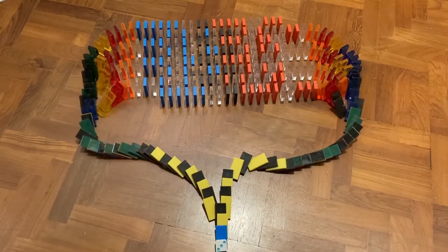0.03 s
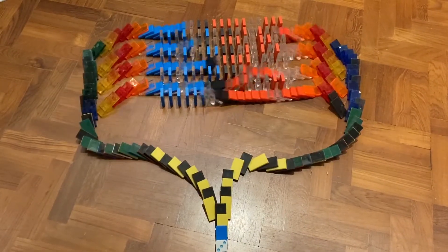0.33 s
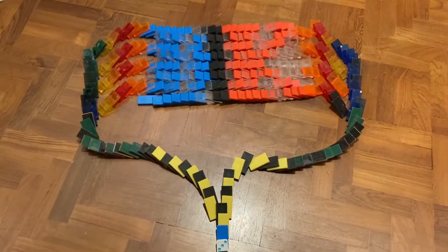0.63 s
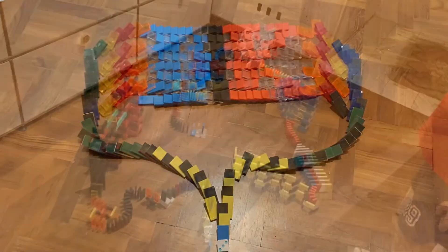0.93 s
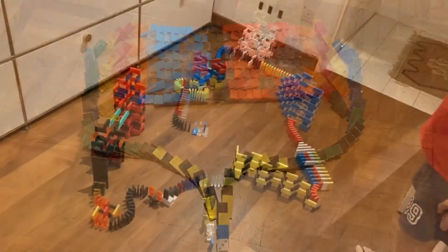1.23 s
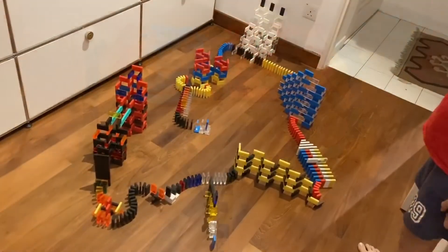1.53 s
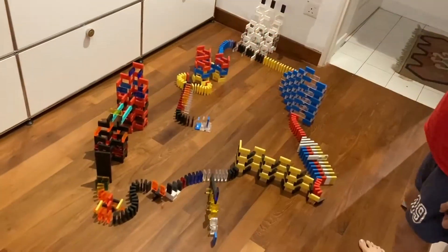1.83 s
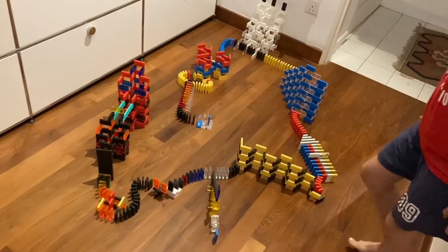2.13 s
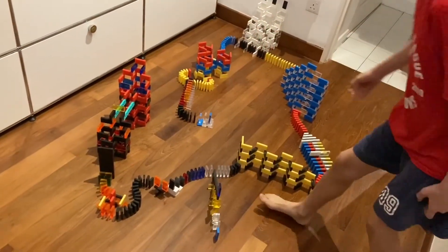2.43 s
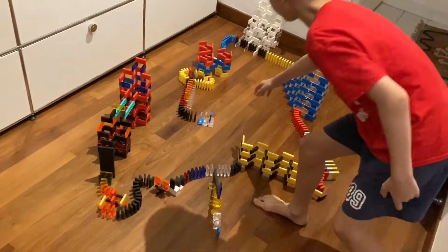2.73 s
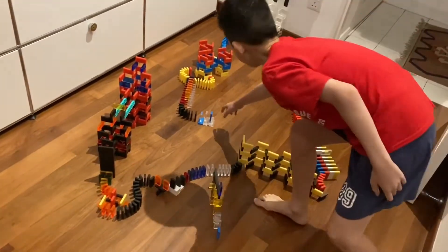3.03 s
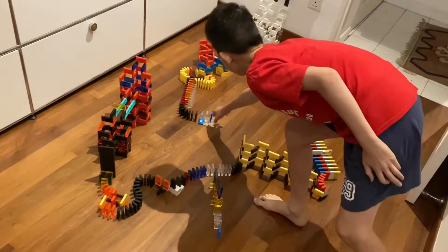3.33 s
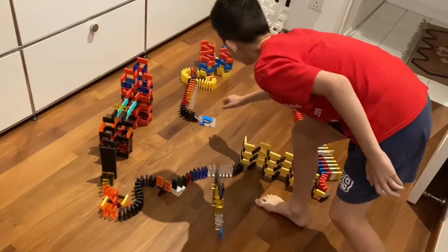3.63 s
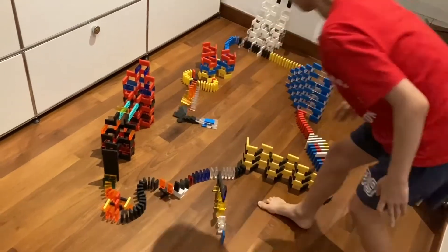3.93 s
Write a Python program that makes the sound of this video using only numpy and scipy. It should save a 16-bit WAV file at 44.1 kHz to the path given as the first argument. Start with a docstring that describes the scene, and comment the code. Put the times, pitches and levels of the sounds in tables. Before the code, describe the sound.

A dense clatter of falling plastic dominoes fades quickly in a small, slightly echoing room. After a quiet stretch with dull footsteps and brushing cloth, a second run begins toppling on the wooden floor, growing louder.

```python
"""A small live room with a wooden floor. A wide field of plastic dominoes clatters down and dies away;
the scene dissolves to a second layout, where someone steps up barefoot, clothes brushing, and tips over
a new line. Each collision is an impulse: a short broadband crack, then the damped free vibration of the
tiles, two kinds with different natural frequencies. The floor boards resonate under the clatter, and
the room adds reverberation and a dull noise."""
import sys
import numpy as np
from scipy import signal
from scipy.fft import rfft, irfft
from scipy.io import wavfile
from scipy.ndimage import uniform_filter1d

SR = 44100
rng = np.random.default_rng(int(sys.argv[2]) if len(sys.argv) > 2 else 0)


def wav_out(sig):
    """Save sig, one row per channel (or a flat mono array), as 16-bit PCM at SR to the path in sys.argv[1]."""
    wavfile.write(sys.argv[1], SR, np.round(np.clip(np.atleast_2d(sig).T, -1, 1) * 32767).astype(np.int16))


N = 176400

# spectra of room noise, cloth and a heel's rumble (frequency [Hz], relative level [dB])
AIR_SPECTRUM = [(20, -23.5), (45, -5), (110, 1.5), (180, 0), (250, -6), (400, -5.5), (600, -11.5),
                (1000, -11), (1700, -18.5), (2500, -28), (4000, -42), (6000, -53), (16000, -55)]
CLOTH_SPECTRUM = [(500, -15), (2000, -5), (3500, 4.5), (5000, 1.5), (7500, 0.5), (11000, -1.5),
                  (16000, -16)]
HEEL_SPECTRUM = [(20, -18.5), (45, -4.5), (100, 3.5), (220, -21.5), (800, -38), (4000, -76.5)]
# course of the room noise, and fade of the field in the dissolve (time [s], gain [dB])
AIR_GAIN = [(0, -2), (0.299, -14), (.65, -19), (.85, -10), (1.3, -3.5), (1.7, -0.5), (2.1, 1), (2.5, 0),
            (3.3, 1.5), (4, -3)]
FIELD_FADE = [(.65, -0.5), (.9, 0), (1.05, -4), (1.4, -11)]
# likeness of the two microphone ports (frequency [Hz], correlation [0-1])
PORT_CORRELATION = [(40, 1), (130, 0.95), (280, 0.9), (550, .45), (1000, .4), (2000, 0.1), (4500, 0.23),
                    (5500, 0.7), (9000, 1), (16000, 1)]
# brushes of cloth and soles (time [s], level [dB], rise [s], decay constant [s])
CLOTH_STROKES = [(1.784, -63.5, .012, 0.055), (1.919, -64.5, 0.016, 0.041), (2.374, -56, 0.03, 0.074),
                 (2.54, -68.5, 0.071, 0.31), (2.81, -72.5, .025, 0.036), (3.045, -58, 0.014, 0.044),
                 (3.13, -54.5, .12, 0.11)]
# faint squeaky scuffs (time [s], level [dB], frequency [Hz])
SQUEAKS = [(2.225, -69.5, 3900), (2.265, -64.5, 2980), (2.36, -66.5, 2430), (2.54, -65, 3640),
           (2.59, -63, 3500), (2.68, -64, 3470), (2.75, -71, 3380)]
# soft footfalls (time [s], level [dB], frequency [Hz], length [s])
FOOTFALLS = [(.955, -43, 67.3, 0.023), (1.539, -38, 50.4, 0.043), (1.903, -40, 73.5, .06),
             (2.636, -45, 57.3, 0.051), (2.81, -45, 48, 0.042)]
# modes of the boards, a faint plastic tick, a larger piece, and each layout's low and high tiles
# (frequency [Hz], relative level [dB], T60 [s])
BOARD_MODES = [(1040, -10, 0.031), (1385, -5.5, 0.065), (1480, -7, .03), (1643, -0.5, .05),
               (1780, -1.5, .06), (2300, -1, .012)]
TICK_MODES = [(3900, -5, .012), (4120, 1, 0.032), (4210, -2, 0.027), (4430, -5, 0.024), (4630, -4, .012)]
BLOCK_MODES = [(1283, -13.5, .02), (1450, -10.5, 0.018), (1660, -12.5, .03), (2664, -1, .02),
               (2866, 0.5, 0.01215), (2990, 2.5, .018)]
FIELD_TILE_MODES = ([(4250, -6.5, .06), (4620, -3, .06), (8100, -6.5, .01), (10490, 1.5, 0.028),
                    (10860, -7.5, 0.055)], [(3490, -13.5, .03), (5584, 4, 0.11), (6060, -2.5, .04),
                    (7560, -7, .02), (12900, -6, 0.05), (14100, -7, 0.023)])
LINE_TILE_MODES = ([(4463, 2, 0.034), (4653, -2.5, .035), (6150, -8.5, .025), (9860, -4.5, .012),
                   (10740, -5, .015)], [(3505, -10.5, 0.022), (5648, -0.5, .05), (6200, -8, .025),
                   (7620, -3, .008), (12880, -3.5, .025), (14380, -7, .014)])
# contacts of the tick, and of the larger piece as it rattles to rest (time [s], level [dB])
TICK_CONTACTS = [(1.795, -51), (1.808, -47), (1.823, -55.5)]
BLOCK_BOUNCES = [(.647, -21.5), (.68, -34.5), (.735, -38), (.785, -36.5), (.81, -41), (.852, -45.5),
                 (.88, -52.5)]
# spectrum of the contact crack (frequency [Hz], relative level [dB])
FIELD_CRACK_SPECTRUM = [(200, -54), (500, -24), (1000, -18), (2000, -7.5), (3500, -3), (5000, 1.5),
                        (8000, 0.5), (10000, 0.5), (12000, -8), (14000, 0.5), (16000, -17.5)]
LINE_CRACK_SPECTRUM = [(200, -26), (500, -26), (1000, -16), (2000, -7), (3500, 0.5), (5000, 4.5),
                       (8000, 3.5), (10000, 0.5), (12000, -0.5), (14000, -4.5), (16000, -10)]
# level of the running clatter (time [s], low tiles [dB], high tiles [dB], boards [dB])
FIELD_CLATTER = [(0, -34, -22.5, -40), (.045, -40, -28.5, -50.5), (.11, -29.5, -23, -43.5),
                 (.17, -23.5, -19.5, -34), (.25, -20.5, -25, -29.5), (.31, -26, -31, -47),
                 (.38, -23.5, -32.5, -57.5), (.5, -24.5, -37.5, -55.5), (.57, -24.5, -36, -48),
                 (.63, -35.5, -47, -61.5), (.65, -24, -42.5, -43), (.71, -43.5, -56.5, -52),
                 (.79, -41.5, -56, -54.5), (.87, -61.5, -72, -62.5), (.94, -75, -90, -93)]
LINE_CLATTER = [(3.31, -55, -76, -90), (3.33, -52.5, -55.5, -69.5), (3.455, -54, -51, -76.5),
                (3.485, -31, -44.5, -51), (3.53, -31, -52, -53.5), (3.595, -43, -56, -55.5),
                (3.61, -30.5, -43, -56), (3.68, -31, -38, -54), (3.74, -30.5, -38.5, -53.5),
                (3.79, -31.5, -28.5, -60), (3.9, -37, -24, -53), (3.94, -38, -34, -59.5),
                (4, -40, -31, -57)]
# collisions that stand out (time [s], level [dB], share of high tile [0-1], ping frequency [Hz])
FIELD_IMPACTS = [(0.062, -21.5, .8, 6090), (.084, -21.5, 1, 5600), (0.1012, -15, .6, 9730),
                 (.125, -20, .7, 7300), (.146, -17, .6, 8360), (0.294, -9, .05, 10200),
                 (0.3186, -21, .05, 10700), (0.3432, -18, .05, 10140), (0.464, -18, .1, 8200),
                 (0.4749, -12, .1, 8230), (0.4894, -18, .1, 8400), (0.6053, -17.5, .05, 10630),
                 (0.641, -26, 0.22, 8000)]
LINE_IMPACTS = [(3.320, -39.5, 0.35, 5764), (3.418, -35, 0.17, 10500), (3.4598, -27, .3, 4620),
                (3.489, -34.5, .05, 4640), (3.516, -30, .05, 10900), (3.561, -32.5, .05, 10900),
                (3.604, -25, .05, 4500), (3.608, -23, .05, 10900), (3.616, -22, .05, 4470),
                (3.654, -24.5, .1, 10800), (3.704, -20.5, .1, 4400), (3.729, -23.5, .1, 4450),
                (3.749, -13, 0.72, 12900), (3.7515, -21, .8, 3510), (3.8, -20.5, 1, 12900),
                (3.825, -10.5, .9, 14300), (3.8449, -17, .9, 14000), (3.876, -14.5, 0.95, 7610),
                (3.9, -14.5, 0.71, 7770), (3.9077, -15, .9, 9300), (3.9615, -17, 1, 7510),
                (3.9655, -18.5, .9, 7600), (3.993, -18, 1, 5600)]
# treble phase between the ports (lag [ms], in-phase frequency [Hz], onset frequency [Hz])
FIELD_PORTS, LINE_PORTS = (0.15, 8420, 2100), (-.225, 11300, 1400)

ROOM_T60_S, TREBLE_T60_S, ROOM_DB, ROOM_BUILD_S = 0.71, 0.41, -3, 0.0017
AIR_DB, MAX_CORRELATION, TOP_HZ = -45, .96, 15900
SCUFF_S, SCUFF_Q, BRUSH_FLICKER_DB = .018, 16, 2.0
DETUNE, SCATTER_DB, CRACK_VARY_DB = 0.0054, 2.5, 3.5  # random spread of pitch, strength and colour
CRACK_S, HIT_CRACK_S, HIT_RISE_S, CONTACT_S = 0.0031, .003, 0.00066, 0.0029
FIELD_RING_DB, LINE_RING_DB, HIT_RING_DB = -3, 0.5, -2  # ring against crack
PING_DB, PING_T60_S = -1.5, .022


def undb(db):
    """Amplitude ratio of a level in decibels."""
    return 10 ** (np.asarray(db) / 20)


def unit(x):
    """Normalisation to unit energy per channel."""
    return x / np.sqrt(np.sum(x ** 2, axis=-1, keepdims=True) + 1e-18)


def curve(points, size):
    """Interpolation of (frequency, value) points over log frequency, at the bins of a transform."""
    hz, value = np.array(points, float).T
    return np.interp(np.log(np.fft.rfftfreq(size, 1 / SR) + 1e-3), np.log(hz), value)


def envelope(points):
    """Amplitude envelope, linear in decibels between (time, gain) points."""
    return undb(np.interp(np.arange(N) / SR, *np.array(points).T))


def tint(x, points):
    """Minimum-phase filtering: folding the cepstrum gives a causal filter with the given spectrum."""
    size = 2 * x.shape[-1]
    cepstrum = irfft(np.log(undb(curve(points, size))))
    cepstrum[1:size // 2] *= 2
    cepstrum[size // 2 + 1:] = 0
    return irfft(rfft(x, size) * np.exp(rfft(cepstrum)))[..., :size // 2]


def noise(spectrum):
    """Spectral shaping of white noise: two uncorrelated channels of rms 1."""
    return unit(tint(rng.standard_normal((2, N)), spectrum)) * np.sqrt(N)


def add(out, start_s, x):
    """Superposition of a sound from a given time."""
    i = max(int(start_s * SR), 0)
    out[:, i:i + x.shape[1]] += x[:, :max(N - i, 0)]


def air():
    """Ambient noise: mostly low frequencies, louder at the second layout."""
    return noise(AIR_SPECTRUM) * undb(AIR_DB) * envelope(AIR_GAIN)


def room(x):
    """Reverberation: a diffuse tail follows the direct sound and decays exponentially, treble first."""
    t = np.arange(SR) / SR
    tail = np.zeros((2, SR))
    for band, t60 in (("low", ROOM_T60_S), ("high", TREBLE_T60_S)):
        crossover = signal.butter(2, 5000, band, fs=SR, output="sos")
        tail += signal.sosfilt(crossover, rng.standard_normal((2, SR))) * np.exp(-np.log(1000) * t / t60)
    tail = unit(tail * (1 - np.exp(-t / ROOM_BUILD_S)))
    return x + undb(ROOM_DB) * signal.fftconvolve(x, tail, axes=1)[:, :N]


def ports(x, lag_ms, agree_hz, from_hz):
    """Coherence of two microphone ports: high in the bass, low midway, high but phase-shifted above."""
    hz = np.fft.rfftfreq(N, 1 / SR)
    alike = np.clip(curve(PORT_CORRELATION, N), 0, MAX_CORRELATION)
    phase_shift = np.exp(-2j * np.pi * (hz - agree_hz) * lag_ms / 1000 * (hz > from_hz))
    left, right = rfft(x)
    mid = left * np.sqrt((1 + alike) / 2)
    side = right * np.sqrt((1 - alike) / 2)
    return irfft(np.array([mid + side, (mid - side) * phase_shift]), N)


def swell(start, rise, fade):
    """Envelope with a linear attack and an exponential decay."""
    t = np.arange(N) / SR - start
    return np.clip(t / rise, 0, 1) * np.exp(-np.maximum(t - rise, 0) / fade)


def brushes():
    """Friction noise: cloth and soles rub unevenly, and a narrow resonance makes each scuff squeak."""
    flicker = unit(uniform_filter1d(rng.standard_normal(N), size=400)) * np.sqrt(N)
    strokes = sum(undb(db) * swell(start, rise, fade) for start, db, rise, fade in CLOTH_STROKES)
    out = strokes * undb(BRUSH_FLICKER_DB * flicker) * noise(CLOTH_SPECTRUM)
    for start, db, hz in SQUEAKS:
        squeak = signal.lfilter(*signal.iirpeak(hz, SCUFF_Q, fs=SR), rng.standard_normal((2, N)))
        out += undb(db) * swell(start, SCUFF_S, SCUFF_S) * unit(squeak) * np.sqrt(N)
    return out


def steps():
    """Soft impact: a bare heel on the floor excites only a low tone and a rumble."""
    out, t = np.zeros((2, N)), np.arange(SR // 2) / SR
    for start, db, hz, length in FOOTFALLS:
        rumble = noise(HEEL_SPECTRUM)[:, :len(t)]
        pulse = (2 * t / length) * np.exp(1 - 2 * t / length)
        add(out, start, undb(db) * pulse * (1.6 * np.sin(2 * np.pi * hz * t) + 0.7 * rumble))
    return out


def ring(modes, size=4096):
    """Free vibration of a struck piece: a sum of damped modes, each slightly detuned."""
    t = np.arange(size) / SR
    hz, db, t60 = np.array(modes, float).T[:, :, None]
    hz = hz * (1 + DETUNE * rng.standard_normal(hz.shape))
    phase = rng.random((2, len(hz), 1))
    waves = np.sin(2 * np.pi * (hz * t + phase)) * np.exp(-np.log(1000) * t / t60)
    return unit(np.sum(undb(db) * unit(waves), axis=1))


def blow(sound, db):
    """Hard impact: a quick rise, and the energy of the given level held for CONTACT_S."""
    rise = 1 - np.exp(-np.arange(sound.shape[1]) / SR / HIT_RISE_S)
    return undb(db) * np.sqrt(CONTACT_S * SR) * unit(sound * rise)


def knocks(modes, contacts):
    """Impulse excitation: a piece rings at each contact, a little differently every time."""
    out = np.zeros((2, N))
    for start, db in contacts:
        add(out, start, blow(ring(modes), db))
    return out


def clack(spectrum, tiles, high_share, ring_db, crack_s, size=4096):
    """Contact transient and modal ring of a collision; the crack's colour depends on where tiles touch."""
    hz = np.linspace(200, TOP_HZ, 24)
    base_hz, base_db = np.array(spectrum, float).T
    db = np.interp(np.log(hz), np.log(base_hz), base_db)
    db += CRACK_VARY_DB * np.clip(rng.standard_normal(len(hz)), -2, 2)
    burst = rng.standard_normal((2, size)) * np.exp(-np.arange(size) / SR / crack_s)
    crack = unit(tint(burst, np.column_stack([hz, db])))
    rings = np.sqrt(1 - high_share) * ring(tiles[0]) + np.sqrt(high_share) * ring(tiles[1])
    return unit(crack + undb(ring_db) * rings)


def clatter(times, db, strike, per_second, variants=14):
    """Incoherent addition: strikes of random timing and strength sum in energy to follow a level curve."""
    count = int(per_second * N / SR)
    starts = (np.arange(count) + 2 * rng.random(count)) / per_second
    scatter = undb(SCATTER_DB * np.clip(rng.standard_normal(count), -2, 2))
    level = undb(np.interp(starts, times, db, left=-np.inf, right=-np.inf))
    strength = unit(scatter) * np.sqrt(N) * level
    choice = rng.integers(variants, size=count)
    sounds = [strike() for _ in range(variants)]
    out = np.zeros((2, N))
    for i in np.flatnonzero(strength):
        add(out, starts[i], strength[i] * sounds[choice[i]])
    return out


def dominoes(levels, impacts, tiles, spectrum, ring_db, per_second):
    """A chain of impacts: both kinds of tile clatter, the boards resonate, hard collisions stand out."""
    t, low_db, high_db, boards_db = np.array(levels, float).T
    out = clatter(t, low_db, lambda: clack(spectrum, tiles, 0, ring_db, CRACK_S), per_second)
    out += clatter(t, high_db, lambda: clack(spectrum, tiles, 1, ring_db, CRACK_S), per_second)
    out += clatter(t, boards_db, lambda: ring(BOARD_MODES), per_second)
    for start, db, high_share, hz in impacts:
        ping = undb(PING_DB) * ring([(hz, 0, PING_T60_S)])
        collision = clack(spectrum, tiles, high_share, HIT_RING_DB, HIT_CRACK_S)
        add(out, start, blow(collision + ping, db))
    return out


def scene():
    """Superposition of the two layouts: the field falls and fades, then come steps and the new line."""
    field = dominoes(FIELD_CLATTER, FIELD_IMPACTS, FIELD_TILE_MODES, FIELD_CRACK_SPECTRUM,
                     FIELD_RING_DB, per_second=420)
    field += knocks(BLOCK_MODES, BLOCK_BOUNCES)
    line = dominoes(LINE_CLATTER, LINE_IMPACTS, LINE_TILE_MODES, LINE_CRACK_SPECTRUM,
                    LINE_RING_DB, per_second=330)
    line += brushes() + knocks(TICK_MODES, TICK_CONTACTS)
    first = room(field) * envelope(FIELD_FADE)
    second = room(line) + steps() + air()
    return ports(first, *FIELD_PORTS) + ports(second, *LINE_PORTS)


def record(dry):
    """Band limiting: a steep low-pass filter removes the highest treble."""
    return signal.sosfilt(signal.ellip(10, .2, 70, TOP_HZ, fs=SR, output="sos"), dry)


dry = scene()
out = record(dry)
wav_out(out)
```